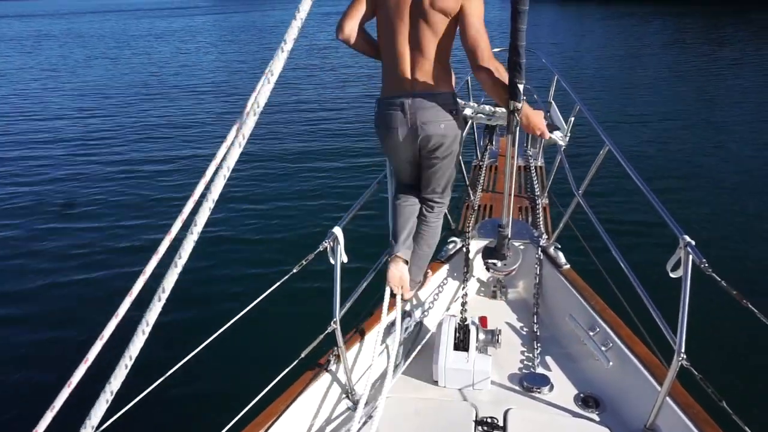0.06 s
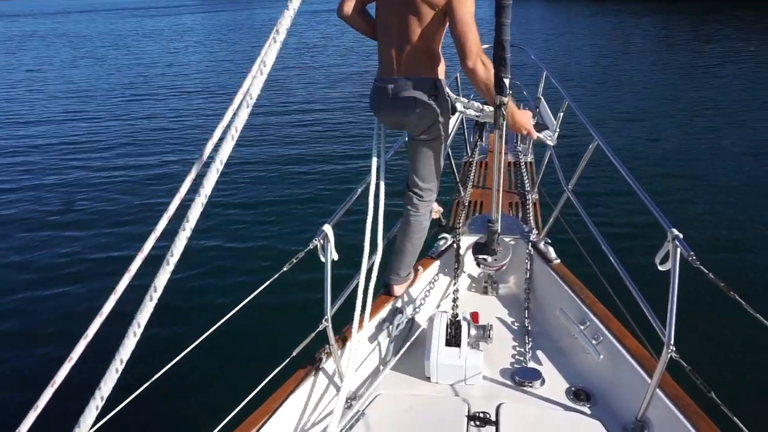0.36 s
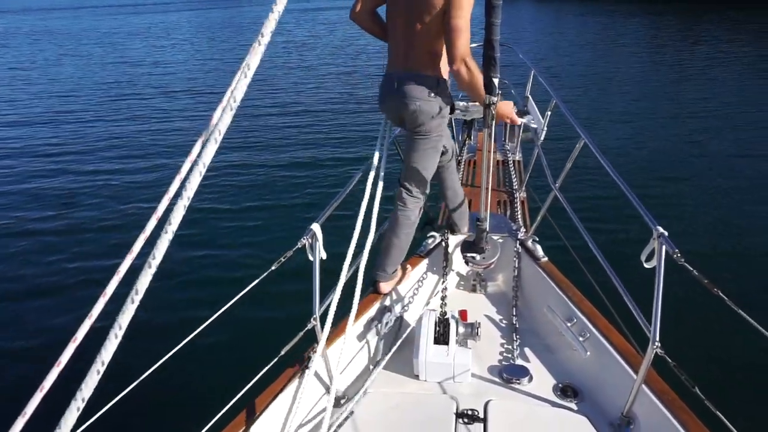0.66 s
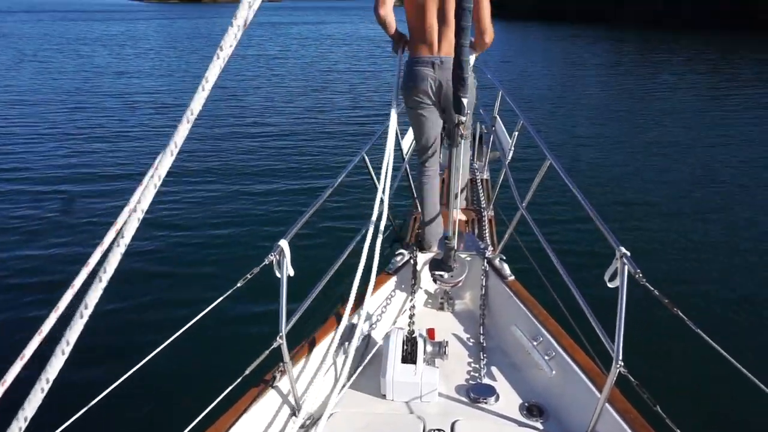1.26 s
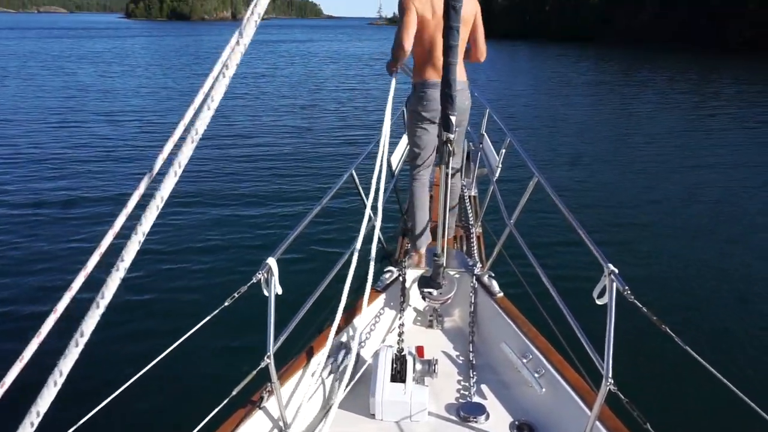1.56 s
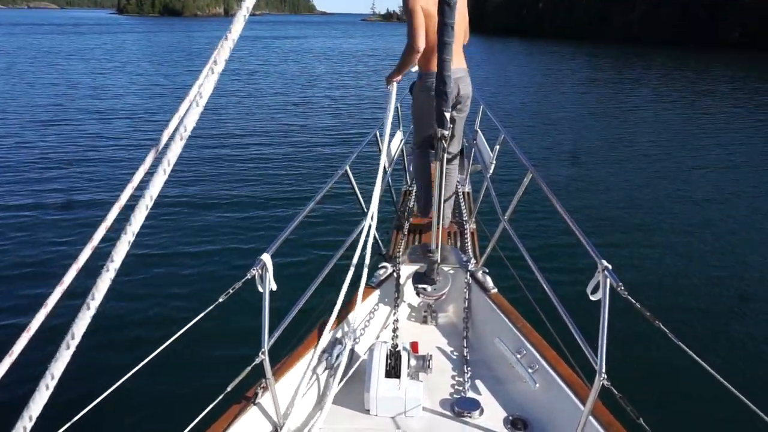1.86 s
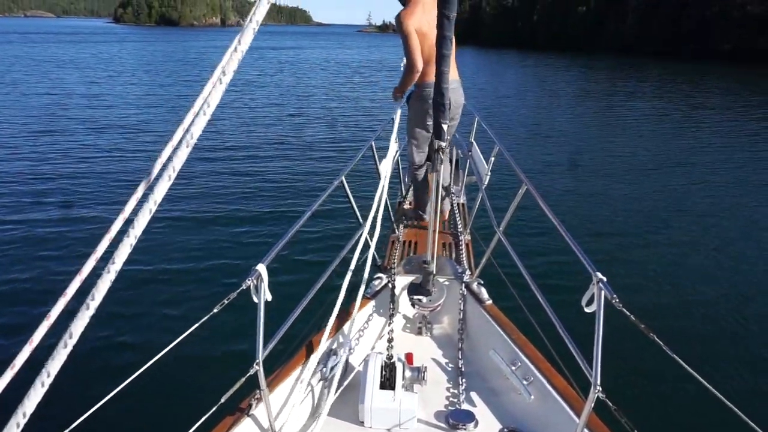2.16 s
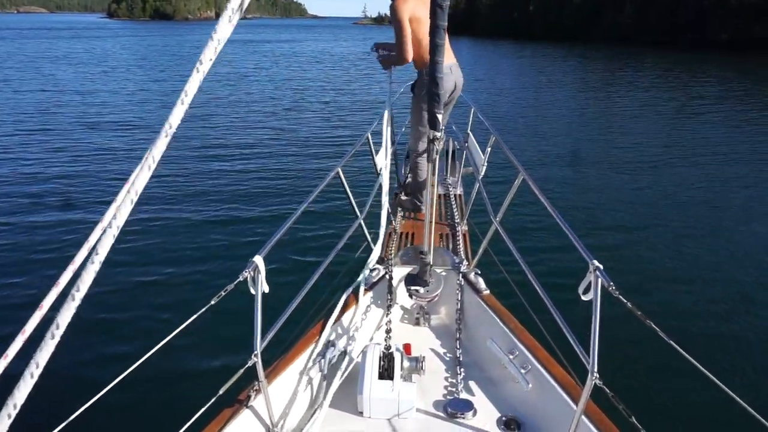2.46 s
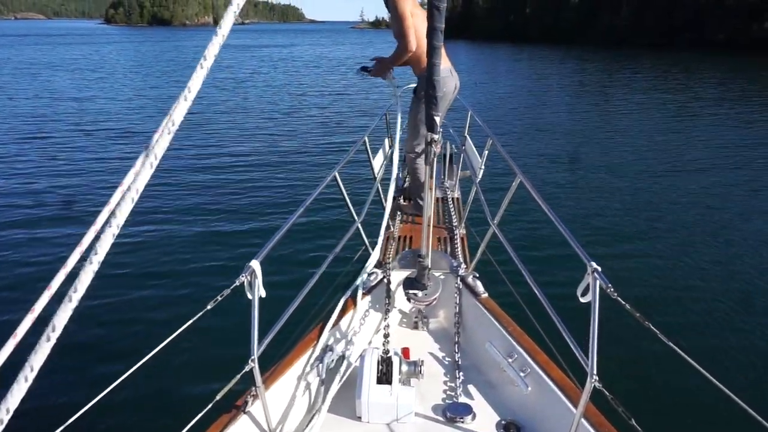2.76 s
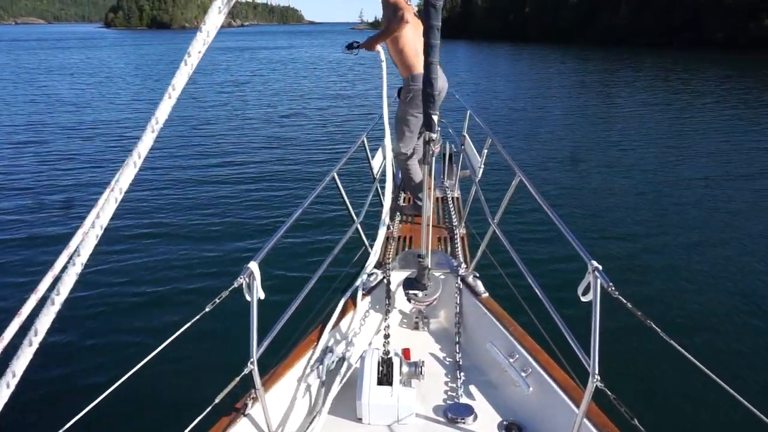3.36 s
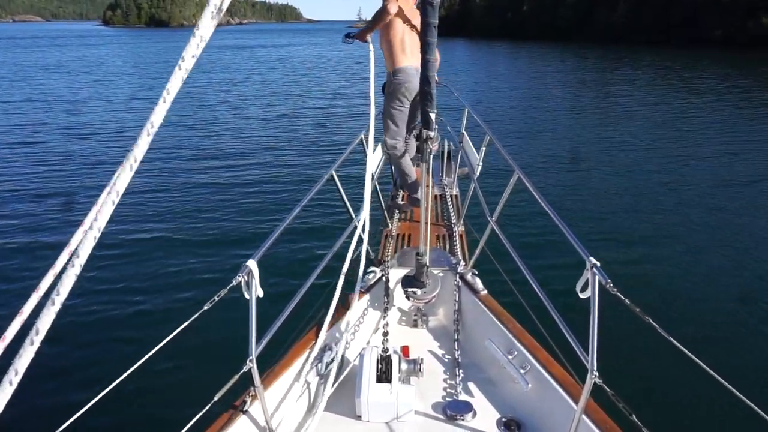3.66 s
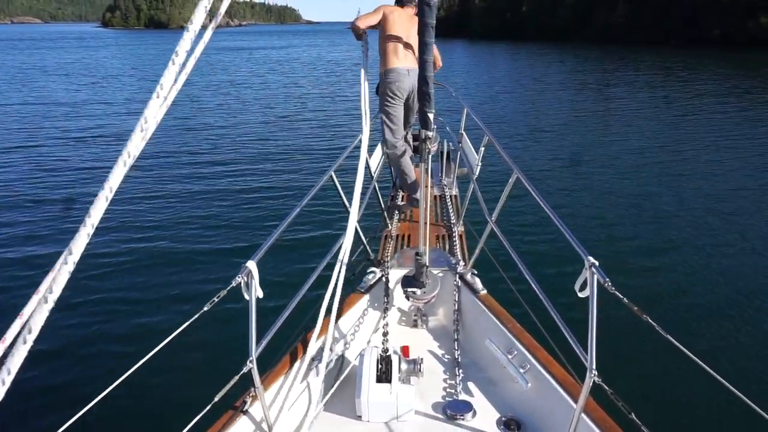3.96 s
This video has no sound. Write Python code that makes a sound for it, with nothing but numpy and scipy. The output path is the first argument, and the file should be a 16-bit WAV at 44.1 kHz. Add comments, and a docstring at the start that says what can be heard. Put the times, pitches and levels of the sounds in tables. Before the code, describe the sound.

Knocking steps and clicking fittings on a sailing boat's bow, with gusts rumbling on the microphone.

```python
"""On a sailing boat's wooden bowsprit, in calm water, someone walks out barefoot and handles a line.
Feet and gear knock the planks into damped vibration, and fittings click. Rope, cloth and soles scuff
by stick-slip friction; a steel rail resonates when rubbed or jolted. Gusts shed eddies that buffet
the two microphone ports and hiss past them, over a faint floor of ripples."""
import sys
import numpy as np
from scipy import signal
from scipy.fft import rfft, irfft, next_fast_len
from scipy.io import wavfile
from scipy.ndimage import map_coordinates

SR = 44100
rng = np.random.default_rng(int(sys.argv[2]) if len(sys.argv) > 2 else 0)


def transcribe(signal):
    """Save signal, clipped to [-1, 1], as a 16-bit WAV file at the path in sys.argv[1]."""
    frames = np.atleast_2d(signal).T
    limited = np.clip(frames, -1, 1)
    pcm = np.round(limited * 32767).astype(np.int16)
    wavfile.write(sys.argv[1], SR, pcm)


N = 176400
T = np.arange(N) / SR
DECK_PAN_DB = -2  # every pan is left level minus right level
GRAIN_RATE, GRAIN_SPREAD = 7000, 0.41  # friction: slips a second, spread of their log size


def amp(db):
    """Decibels to gain."""
    return 10 ** (np.asarray(db) / 20)


def unit(x):
    """Scale to rms 1."""
    return x / np.sqrt(np.mean(x ** 2) + 1e-20)


def along(points, hz):
    """Gain of (frequency [Hz], level [dB]) points on a log axis."""
    freqs, levels = np.transpose(points)
    return amp(np.interp(np.log(hz + 1), np.log(freqs + 1), levels))


def filtered(x, response):
    """Multiply the spectrum of x by a frequency response."""
    n = x.shape[-1]
    padded = next_fast_len(n + 8192)
    return irfft(rfft(x, padded) * response(np.fft.rfftfreq(padded, 1 / SR)), padded)[..., :n]


def high_passed(x, edge_hz):
    """Second-order roll-off of the bass."""
    return signal.sosfilt(signal.butter(2, edge_hz, "highpass", fs=SR, output="sos"), x)


def wobble(rate):
    """A smooth random curve, rate knots a second."""
    return map_coordinates(rng.standard_normal(int(T[-1] * rate) + 4), [T * rate])


def grains(rate, spread):
    """Two Poisson impulse trains with log-normal sizes."""
    impulses = (rng.random((2, N)) < rate / SR) * np.sign(rng.standard_normal((2, N)))
    return impulses * np.exp(spread * rng.standard_normal((2, N)))


def panned(x, pan_db):
    """Set a level difference between the channels."""
    return x * amp([[pan_db / 2], [-pan_db / 2]])


def stereo(pair, response, pan_db=0):
    """Colour two unrelated signals into a normalised left and right, coherent in the bass."""
    def mid_and_side(hz):
        angle = np.pi / 4 * hz / np.hypot(hz, 1710)
        return response(hz) * np.array([np.cos(angle), np.sin(angle)])
    mid, side = filtered(pair, mid_and_side)
    return panned(unit(np.array([mid + side, mid - side])), pan_db)


def noise(spectrum, pan_db=0):
    """Stereo noise with the given spectrum."""
    return stereo(rng.standard_normal((2, N)), lambda hz: along(spectrum, hz), pan_db)


def swell(s, half_width):
    """A Gaussian envelope centred on time s."""
    return np.exp(-np.minimum(((T - s) / half_width) ** 2, 50))


def struck(t, t60, rise):
    """A quick rise, then exponential decay by 60 dB in t60 seconds."""
    return amp(-60 * t / t60) * (1 - np.exp(-t / rise))


def add(track, s, sound):
    """Lay a sound into a track at time s."""
    part = track[..., round(s * SR):][..., :sound.shape[-1]]
    part += sound[..., :part.shape[-1]]


def water():
    """Amplitude modulation: faint ripples waver a steady wash of noise."""
    # spectrum of the wash (frequency [Hz], level [dB])
    wash = [(25, -9), (80, -0.5), (300, -2), (700, -3.5), (1500, -9), (3000, -10.5), (6500, -15.5),
            (11000, -15)]
    return amp(-56.5 + 0.52 * wobble(14)) * noise(wash, pan_db=-2.5)


def wind():
    """Turbulent pressure: eddies hit the left port, then the right, brighter as the wind rises."""
    # wind strength at the microphone (time [s], level [dB])
    gusts = [(0, -78), (.19, -59.5), (.22, -51.5), (.37, -53), (.44, -39.5), (.5, -48), (.6, -51.5),
             (.81, -55.5), (.94, -62), (.97, -36.5), (1.03, -45.5), (1.08, -35), (1.2, -52.5), (1.35, -41),
             (1.6, -54.5), (1.7, -35), (1.735, -38.5), (1.77, -29.5), (1.86, -40.5), (1.88, -30.5),
             (1.91, -35.5), (1.98, -33.5), (2.01, -46), (2.09, -53), (2.13, -64), (2.22, -74),
             (2.33, -46.5), (2.42, -71), (2.5, -60), (2.88, -56), (2.95, -84), (3.19, -68), (3.245, -33.5),
             (3.36, -27.5), (3.44, -45.5), (3.47, -25.5), (3.55, -36), (3.615, -35.5), (3.65, -20),
             (3.675, -29.5), (3.715, -24.5), (3.75, -31.5), (3.81, -28.5), (3.855, -38), (3.9, -22),
             (3.935, -28.5), (3.96, -21.5), (4, -25)]
    # single strong eddies (time [s], peak [dB], pitch [Hz])
    eddies = [(.347, -29.5, 160), (0.417, -29.5, 131), (.64, -30, 131), (.7, -25.5, 225),
              (.962, -22.5, 200), (0.985, -23.5, 271), (1.082, -23.5, 174), (1.705, -17, 203),
              (1.766, -14.5, 343), (1.796, -15.5, 260), (1.983, -17, 407), (2.467, -35.5, 182),
              (2.523, -31.5, 124), (3.154, -29.5, 174), (3.304, -18.5, 303), (3.363, -10.5, 367),
              (3.463, -14.5, 546), (3.642, -15.5, 170), (3.656, -8.5, 270), (3.691, -6.5, 353),
              (3.898, -9, 345), (3.92, -12.5, 416), (3.962, -9.5, 313), (3.98, -13, 288)]
    # spectrum of the deep buffeting (frequency [Hz], level [dB])
    rumble_band = [(20, -60), (50, -17.5), (100, -4), (170, -1.5), (300, -10), (450, -37), (800, -34),
                   (2000, -84)]
    # spectrum of the brighter buffeting (frequency [Hz], level [dB])
    flutter_band = [(100, -24.5), (220, -1), (330, -0.5), (480, -6.5), (750, -18.5), (1100, -38.5),
                    (1600, -52), (4000, -75)]
    reference_db, half_width_cycles, crossing_s = -30, 0.51, 0.0008
    churn_db = 3.5 * (np.tanh(wobble(60)) - .2)  # breaks the buffeting into lumps
    gust_db = np.interp(T, *np.transpose(gusts)) - reference_db + churn_db
    buffeting = lambda band: unit(filtered(grains(rate=480, spread=0.39), lambda hz: along(band, hz)))
    rumble = buffeting(rumble_band) * amp(-1.5 + 0.72 * gust_db)
    flutter = buffeting(flutter_band) * amp(-0.5 + 1.15 * gust_db)
    common, opposed = amp(reference_db) * (rumble + flutter)  # in phase and antiphase at the ports
    for s, db, hz in eddies:
        common += amp(db) * swell(s, half_width_cycles / hz) * np.sin(2 * np.pi * hz * (T - s))
    opposed = amp(-6) * high_passed(opposed, edge_hz=78)
    left = np.interp(T + crossing_s / 2, T, common + opposed)
    right = np.interp(T - crossing_s / 2, T, common - opposed)
    return np.array([left, right])


def scuffs():
    """Stick-slip friction: fibres catch and release in dense grains under each short stroke."""
    # rope, cloth and soles (time [s], half-width [s], level [dB], tilt [dB/octave], pan [dB])
    strokes = [(0.117, 0.0075, -50, 6, -2), (0.658, 0.014, -50, -1, -2), (0.715, 0.024, -47.5, -1, -1),
               (0.881, 0.043, -42, 0.5, -1.5), (1.046, 0.0092, -33.5, 1.5, -3),
               (1.249, 0.034, -43, 2.5, -1), (1.301, 0.0053, -29.5, 3.5, -2), (1.314, 0.0068, -29, 1, -1),
               (1.622, 0.012, -45, -0.5, -7), (1.838, 0.014, -42.5, -1, -1), (2.161, 0.0084, -42, 2.5, -4),
               (2.318, 0.015, -43, 8.5, -3), (2.37, 0.0062, -36.5, 8, -15), (2.603, 0.079, -51, 2, -3.5),
               (2.604, 0.0074, -38.5, 2, -4), (2.691, 0.016, -44.5, -1, -5), (3.574, 0.015, -34, 3, -7.5)]
    # friction spectrum (frequency [Hz], level [dB])
    spectrum = [(200, 15), (800, 2.5), (1500, 6.5), (2100, 4), (2700, 5.5), (3600, 1), (5500, -7),
                (8000, -12.5), (11000, -11.5)]
    slips, sound = grains(GRAIN_RATE, GRAIN_SPREAD), np.zeros((2, N))
    for s, half_width, db, tilt, pan in strokes:
        tilted = lambda hz: along(spectrum, hz) * amp(tilt * np.log2(hz + 1))
        sound += amp(db) * swell(s, half_width) * stereo(slips, tilted, pan)
    return sound


def rubs():
    """Forced vibration: soft friction drives one broad resonance of the deck."""
    # dull rubs of feet (time [s], half-width [s], level [dB], pitch [Hz])
    strokes = [(0.154, 0.051, -56.5, 680), (0.841, 0.013, -46.5, 526), (2.337, 0.066, -42.5, 440),
               (2.573, 0.022, -47.5, 510), (2.705, 0.058, -43.5, 436), (3.557, 0.0077, -35.5, 810),
               (3.818, 0.025, -40, 850), (3.855, 0.0052, -35, 800)]
    skirt_db_per_octave = -24
    slips, sound = grains(GRAIN_RATE, GRAIN_SPREAD), np.zeros((2, N))
    for s, half_width, db, pitch in strokes:
        resonance = lambda hz: amp(skirt_db_per_octave * abs(np.log2((hz + 1) / pitch)))
        sound += amp(db) * swell(s, half_width) * stereo(slips, resonance)
    return sound


def knocks():
    """Impact excitation: plank and struck spot ring in damped modes; harder blows crack more."""
    # blows (time [s], level [dB], thud pitch [Hz], hardness [dB], ring pitch [Hz], ring level [dB])
    blows = [(0.5747, -34, 296, -1.5, 802, -41.5), (1.045, -27.5, 395, -16, 573, -34),
             (1.094, -37, 302, 7.5, 1346, -44), (1.119, -40.5, 336, 5, 1020, -45),
             (1.864, -39.5, 706, 3, 1470, -41), (2.155, -37, 470, -6, 863, -36),
             (2.249, -23, 393, 6, 907, -29), (2.291, -24.5, 397, -9.5, 560, -47),
             (2.32, -28, 368, -18, 650, -42), (2.607, -28.5, 355, 1.5, 598, -30),
             (2.708, -17, 280, -4.5, 954, -25.5), (2.784, -49, 377, 1, 750, -45.5),
             (2.8277, -25, 291, -11, 633, -39)]
    # modes of a plank (pitch ratio, level [dB], t60 [s])
    plank_modes = [(1, 4.5, 0.04), (1.38, -8.5, 0.074)]
    # modes of the struck spot (pitch ratio, level [dB], t60 [s])
    spot_modes = [(1, 2, 0.063), (1.74, -16.5, 0.054), (2.7, -22, 0.033)]
    # spectrum of the woody crack (frequency [Hz], level [dB])
    crack_band = [(120, -11), (400, 6), (900, -3.5), (1500, -9), (2700, -18.5), (4500, -25), (9000, -37)]
    t, rise_s = T[:SR // 2], 0.00052
    crack_and_tail = amp(-2.5) * struck(t, 0.06, rise_s) + amp(-28) * struck(t, 0.58, rise_s)
    ring, crack_envelope = np.zeros(N), np.zeros(N)
    for s, db, thud_hz, hardness_db, ring_hz, ring_db in blows:
        for modes, hz, base_db in (plank_modes, thud_hz, db), (spot_modes, ring_hz, ring_db):
            for ratio, mode_db, t60 in modes:
                envelope = amp(base_db + mode_db + rng.standard_normal()) * struck(t, t60, rise_s)
                add(ring, s, envelope * np.sin(2 * np.pi * hz * ratio * t))
        add(crack_envelope, s, amp(db + hardness_db) * crack_and_tail)
    crack = crack_envelope * noise(crack_band, DECK_PAN_DB)
    return high_passed(panned(ring, DECK_PAN_DB) + crack, edge_hz=183)


def rail_rub():
    """Resonance: sliding friction drives the steel rail's modes, swelling and fading."""
    # modes of the rail (frequency [Hz], bandwidth [Hz], level [dB])
    modes = [(397, 83, -1), (593, 14, 6.5), (660, 33, -4), (745, 130, -5.5), (1064, 55, -10),
             (1237, 44, -12), (1357, 18, -7), (1483, 38, -10), (2330, 210, -13.5), (2650, 61, -16.5),
             (2940, 96, -14.5), (4120, 150, -30)]
    # how hard the rail is rubbed (time [s], level [dB])
    stroke = [(.8, -100), (1.05, -51), (1.15, -46.5), (1.23, -47), (1.33, -35.5), (1.42, -42), (1.52, -47),
              (1.62, -49), (1.8, -72), (2, -110)]
    # spectrum of the sliding noise (frequency [Hz], level [dB])
    slide_band = [(500, -10), (2500, -7.5), (5000, 1), (8000, -5.5), (11000, -1.5)]

    def steel(hz):
        return sum((-1) ** k * amp(db) * 1j * hz * width / (centre ** 2 - hz ** 2 + 1j * hz * width)
                   for k, (centre, width, db) in enumerate(modes))
    ring = stereo(grains(GRAIN_RATE, GRAIN_SPREAD), steel)
    slide = amp(-9.5) * noise(slide_band)
    return amp(np.interp(T, *np.transpose(stroke))) * (ring + slide)


def clicks():
    """Brief contact, broad spectrum: hard fittings give milliseconds of bright noise."""
    # contacts of fittings (time [s], level [dB])
    contacts = [(1.032, -41), (1.096, -39.5), (1.3, -29), (1.37, -29.5), (2.249, -34), (2.283, -33),
                (2.368, -36), (2.6051, -23.5), (2.677, -39.5), (2.707, -24.5), (3.55, -39)]
    # click spectrum (frequency [Hz], level [dB])
    spectrum = [(300, -4), (1200, -1), (3000, 2), (5000, -4), (8000, -10.5), (11000, -15)]
    envelope = np.zeros(N)
    for s, db in contacts:
        add(envelope, s, amp(db) * struck(T[:SR // 4], t60=0.022, rise=0.000066))
    return envelope * noise(spectrum, DECK_PAN_DB)


def rail_jolt():
    """Free vibration: a jolt leaves the steel rail with a short, bright ring."""
    # jolt on the rail (time [s], rise [s], level [dB], pitch [Hz])
    jolts = [(1.302, 0.0048, -23, 2624)]
    # modes it excites (pitch ratio, level [dB], t60 [s])
    modes = [(.515, -8, .12), (1, 1, 0.062), (1.12, -18, .09), (1.5, -13, .08)]
    ring, t = np.zeros(N), T[:SR // 2]
    for s, rise, db, hz in jolts:
        for ratio, mode_db, t60 in modes:
            add(ring, s, amp(db + mode_db) * struck(t, t60, rise) * np.sin(2 * np.pi * hz * ratio * t))
    return ring


def hiss():
    """Flow noise: stronger gusts hiss, mostly at the right port, and add in power."""
    # air rushing past the ports (time [s], half-width [s], level [dB])
    gusts = [(1.865, 0.14, -52.5), (3.37, 0.079, -51), (3.474, 0.16, -51.5), (3.883, 0.054, -51),
             (3.972, 0.083, -47)]
    # hiss spectrum (frequency [Hz], level [dB])
    spectrum = [(500, -32), (1500, -5), (3200, -2), (6500, -8), (10500, -1)]
    power = sum((amp(db) * swell(s, half_width)) ** 2 for s, half_width, db in gusts)
    return np.sqrt(power) * noise(spectrum, pan_db=-7.5)


def rope_zip():
    """Sliding friction: a short length of rope runs fast with a thin, high zip."""
    # spectrum of running rope (frequency [Hz], level [dB])
    spectrum = [(1500, -7.5), (2600, -7), (4300, -4), (5800, 1), (7400, -9), (9000, 1), (11000, -2)]
    friction = stereo(grains(GRAIN_RATE, GRAIN_SPREAD), lambda hz: along(spectrum, hz), DECK_PAN_DB)
    return amp(-32.5) * swell(2.398, half_width=.017) * friction


def scene():
    """Superposition: water, wind and deck sounds add in open air."""
    handling = high_passed(scuffs() + clicks() + rope_zip(), edge_hz=170)  # small contacts lack bass
    return water() + wind() + handling + rubs() + knocks() + rail_rub() + rail_jolt() + hiss()


def record(dry):
    """Band limiting: the camera keeps nothing above its cutoff frequency."""
    return filtered(dry, lambda hz: hz < 11250)


dry = scene()
out = record(dry)
transcribe(out)
```